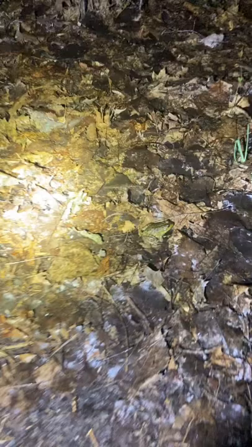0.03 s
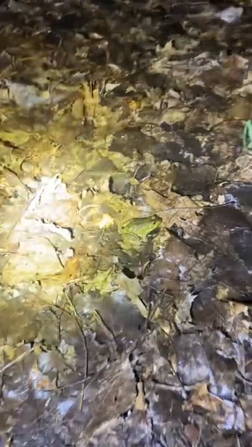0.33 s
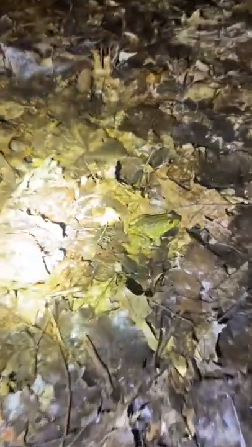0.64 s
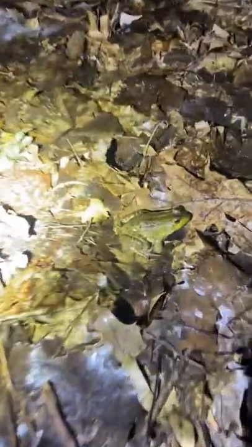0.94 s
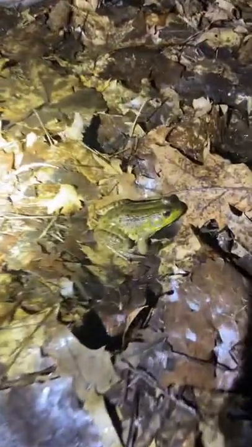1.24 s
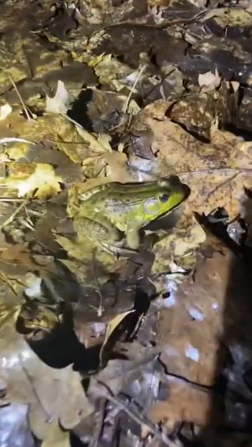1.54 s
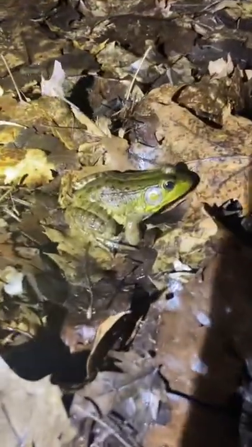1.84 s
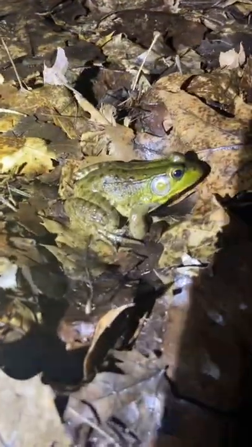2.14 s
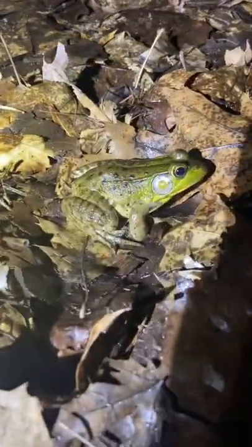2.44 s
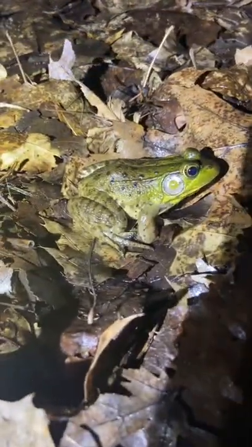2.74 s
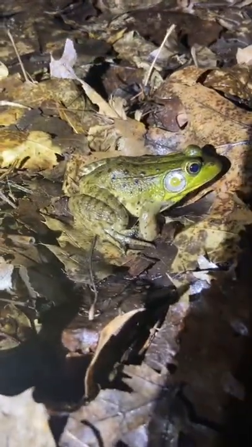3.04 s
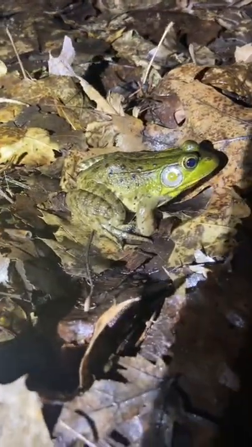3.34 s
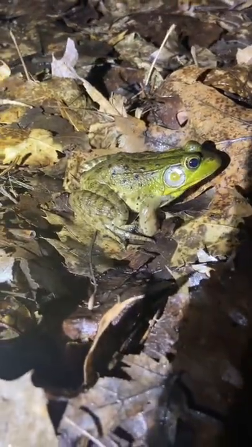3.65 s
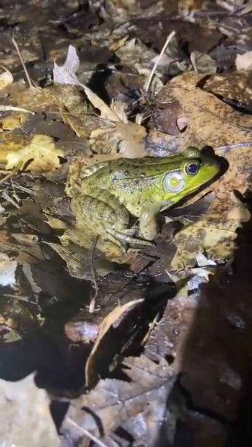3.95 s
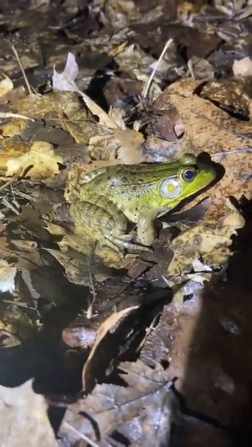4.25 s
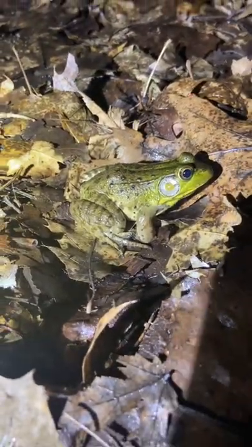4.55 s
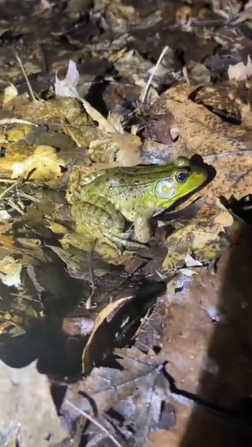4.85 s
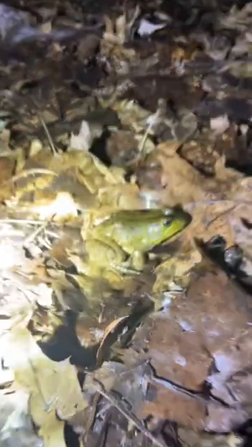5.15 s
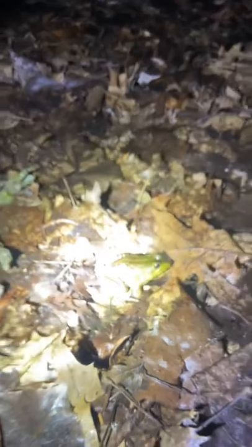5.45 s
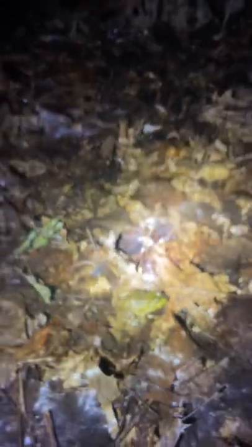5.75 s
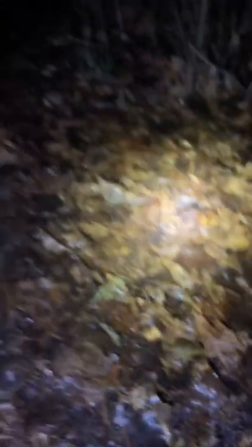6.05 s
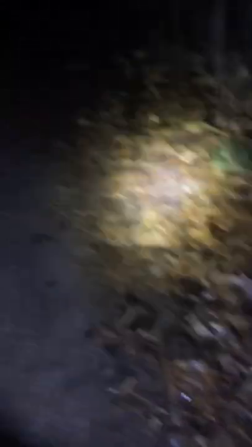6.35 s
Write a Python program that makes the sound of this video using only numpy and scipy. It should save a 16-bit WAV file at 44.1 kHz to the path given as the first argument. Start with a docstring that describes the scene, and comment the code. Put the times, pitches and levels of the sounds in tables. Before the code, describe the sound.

A wide, distant chorus of small frogs keeps up short, high, rising whistles, with a few nearer peeps standing out and faint trills below. Throughout, drops from the branches tick on the forest floor, some close and sharp. Leaves crunch briefly at the start, two louder drips land about five seconds in, and a light rustle and low handling thumps on the hand-held microphone come at the end.

```python
"""Rain drips tap on dead leaves all around, over the steady high peeping of a distant pond of frogs.
Each peep is a short rising whistle scattered by the trunks; fainter, lower voices trill beneath.
Each drip thuds, rings its leaf, snaps and sprays; a few add a brief clear tone. The litter rustles
and cracks briefly, and a low far rumble fills the night forest. Fingers bump the hand-held recorder
a few times; its two ports hear the ground a little apart in time."""
import sys
import numpy as np
from scipy import signal
from scipy.fft import rfft, irfft
from scipy.io import wavfile

SR = 44100
rng = np.random.default_rng(int(sys.argv[2]) if len(sys.argv) > 2 else 0)


def to_wav(s):
    """Save 16-bit WAV."""
    ch = np.atleast_2d(s).T  # columns
    pcm = np.round(np.clip(ch, -1, 1) * 32767)  # PCM
    wavfile.write(sys.argv[1], SR, pcm.astype(np.int16))


N = 282240
TAP_SAMPLES = SR // 30
TIME = np.arange(N) / SR
FREQS = np.maximum(np.arange(N // 2 + 1) * SR / N, 1)


def from_db(db):
    """Decibels to gain."""
    return 10 ** (np.asarray(db) / 20)


def rms_one(x):
    """Scale to unit power."""
    return x / np.sqrt(np.mean(x ** 2) + 1e-20)


def in_time(rows):
    """An automation curve: straight lines between (seconds, value) points."""
    return np.interp(TIME, *np.transpose(rows))


def at_freqs(points):
    """Straight lines between (Hz, value) points on a log-frequency axis."""
    hz, value = np.transpose(points)
    return np.interp(np.log(FREQS), np.log(hz), value)


def spread(shape=None):
    """Even chance between minus one and one."""
    return 2 * rng.random(shape) - 1


def drift(per_s):
    """A random wander through per_s points a second, drawn with spread 1."""
    knots = rng.standard_normal(2000)
    return np.interp(TIME * per_s, np.arange(len(knots)), knots)


def colour(x, spectrum):
    """Minimum-phase EQ, so nothing rings ahead of a hit; comes out at unit power."""
    cepstrum = irfft(np.log(from_db(at_freqs(spectrum))), N)
    cepstrum[1:N // 2] *= 2
    cepstrum[N // 2 + 1:] = 0
    return rms_one(irfft(rfft(x) * np.exp(rfft(cepstrum)), N))


def band(x, low_hz, high_hz):
    """Gentle band-pass."""
    sos = signal.butter(2, [low_hz, min(high_hz, .45 * SR)], "band", fs=SR, output="sos")
    return signal.sosfilt(sos, x + 1e-18)


def noise(spectrum):
    """Two unrelated noises of one colour."""
    return colour(rng.standard_normal((2, N)), spectrum)


def forest(x, t60_s=0.47):
    """Far sound arrives only as scatter from trunks, by two unrelated paths; unit power."""
    scatter = rng.standard_normal((2, SR)) * from_db(-60 * TIME[:SR] / t60_s)
    return rms_one(irfft(rfft(x) * rfft(scatter, N), N))


def ports(pair, floor_likeness=0):
    """The two ports turn a pair of signals into left and right: partly alike, the right one lagging."""
    # Stereo lag. Each row: frequency in Hz, lead of the left port in radians.
    left_lead = [(20, 0.25), (330, 0.18), (520, 1.83), (850, 2.34), (1400, 0.23), (2200, 1), (3000, 1.54),
                 (3400, 1.2), (3900, 0.9), (5000, 1.0), (6200, 1.8), (7200, 2.96), (10700, 6.2),
                 (13600, 9.3), (16000, 10.5)]
    # Stereo image. Each row: frequency in Hz, likeness of the ports from 0 to 1.
    likeness = [(20, 1), (100, 1), (170, 0.99), (280, 0.81), (480, 0.047), (850, 0.31), (1400, 0.036),
                (2100, 0.56), (3200, 0.6), (4000, 0.5), (5000, 1), (7200, 0.99), (11000, 0.92),
                (16000, 0.92)]
    alike = np.clip(at_freqs(likeness), floor_likeness, 1)
    mid = np.sqrt((1 + alike) / 2) * rfft(pair[0])
    side = np.sqrt((1 - alike) / 2) * rfft(pair[1])
    return irfft([mid + side, (mid - side) * np.exp(-1j * at_freqs(left_lead))], N)


def air(rumble_db=-53.5, hush_db=-67.0, waver_db=4.0):
    """The bed: a steady far rumble under a faint, wavering hush."""
    # EQ of the rumble and of the hush. Each row: frequency in Hz, gain in dB.
    rumble_eq = [(20, -39), (35, -15.5), (58, 1), (85, 0.5), (120, -4), (170, -3.5), (240, -10.5),
                 (330, -17), (500, -19.5), (900, -30.5), (2000, -54.5)]
    hush_eq = [(150, -10), (350, -8), (700, 4.5), (1200, 3), (2300, -8), (3800, -1.5), (6000, -27),
               (10000, -16.5), (16000, -14)]
    rumble = from_db(rumble_db) * noise(rumble_eq)
    return rumble + from_db(hush_db + waver_db * drift(14)) * noise(hush_eq)


def grains(per_s, spread_db, max_spreads, tail_s, colour_db=8.0):
    """Tiny random impacts, each with its own colour and a brief shiver of the leaf."""
    sizes = from_db(spread_db * np.minimum(rng.exponential(1, N), max_spreads))
    hits = sizes * (rng.random(N) < per_s / SR)
    decay = np.exp(-2 / (tail_s * SR))
    edges_hz = [150, 1300, 2900, 7000, 17000]
    out = 0
    for k, (low, high) in enumerate(zip(edges_hz, edges_hz[1:])):
        share = hits * from_db(colour_db * np.sqrt(3) * spread(N))
        tails = np.sqrt(signal.lfilter([1 - decay], [1, -decay], share ** 2 + 1e-18))
        clicks = share * rng.choice([-1, 1], (2, N))
        shiver = tails * rng.standard_normal((2, N))
        out = out + (-1) ** k * band(clicks + shiver, low, high)  # flipped so the bands join up
    return out


def rain(patter_db=12.5, hiss_db=5.0):
    """Countless small drops patter on the litter; the farthest merge into a hiss."""
    # Fader for patter and hiss together. Each row: time in seconds, level in dB.
    fader = [(0.05, -73), (0.56, -68.5), (0.77, -74.5), (2.86, -76.5), (5.08, -76), (5.91, -70),
             (6.35, -73)]
    # EQ of the wet litter. Each row: frequency in Hz, gain in dB.
    patter_eq = [(200, -20), (600, 0.5), (1300, -1), (2200, 3), (3800, -1.5), (5500, -1), (8000, -7.5),
                 (12000, -9.5), (16000, -26)]
    drops = colour(grains(per_s=130, spread_db=4.0, max_spreads=0.84, tail_s=0.026), patter_eq)
    return from_db(in_time(fader)) * (from_db(patter_db) * drops + from_db(hiss_db) * noise(patter_eq))


def rustle():
    """Leaves shift against each other in swells of soft crackle; the drier ones add a crisp swish."""
    # Shifts of the litter. Each row: crest in seconds, level in dB, rise and fall in seconds per 20 dB,
    # swish in dB relative to that level.
    shifts = [(0.13, -54.5, 0.28, 0.2, -6), (0.52, -59.5, 0.85, 0.22, -8), (0.62, -56, 0.1, 1, -20),
              (0.84, -58.5, 0.57, 0.45, -8), (1.2, -63, 0.33, 0.74, -0.5), (6.0, -61.5, 1, 0.87, -5)]
    # EQ of the soft crackle. Each row: frequency in Hz, gain in dB.
    rustle_eq = [(100, -25), (400, -4.5), (900, -8), (1800, 8), (2500, 1), (3300, -17), (4500, -13.5),
                 (7000, -9), (15000, -12)]
    clumped_per_s = 500 * from_db(3.4 * drift(40))
    crackle = grains(clumped_per_s, spread_db=2.0, max_spreads=1.7, tail_s=0.0078, colour_db=1.0)
    swish = rms_one(band(crackle, 3700, 5600))
    crest_s, level_db, rise_s, fall_s, swish_db = np.transpose(shifts)[:, :, None]
    from_crest = np.maximum((crest_s - TIME) / rise_s, (TIME - crest_s) / fall_s)
    swells = from_db(level_db - 20 * from_crest.clip(0, 10))
    soft = swells.max(axis=0) * colour(crackle, rustle_eq)
    return soft + (swells * from_db(swish_db)).max(axis=0) * swish


def tap(tail_s, shiver, ring=0.0, ring_hz=1930, ring_s=0.0013, rebound=0.1, aside=2.4):
    """One impact: a spike, a rebound, a noisy shiver and, with ring, a few cycles of the leaf's tone."""
    t = TIME[:TAP_SAMPLES]
    fade = np.exp(-t / tail_s)
    hit = shiver * rng.standard_normal((2, len(t))) * fade / np.linalg.norm(fade)
    hit[:, 0] += [1, aside * rng.choice([-1, 1])]  # the second signal sets the hit off to one side
    hit[0, int(rng.uniform(.0012, .0026) * SR)] += rebound * spread()
    tone = np.exp(-t / ring_s) * np.cos(2 * np.pi * ring_hz * t)
    hit[0] += ring * tone / (ring_s * SR / 2)
    return hit / np.linalg.norm(hit[0]) / (1 + ring / 2)


def tap_span(start_s):
    """The samples that one impact fills."""
    start = int(start_s * SR)
    return slice(start, start + TAP_SAMPLES)


def knocks(rows, log_width, tail_s, shiver):
    """Brief impacts, each confined to a band round its own pitch."""
    out = np.zeros((2, N + SR))
    for start_s, level_db, hz in rows:
        knock = band(tap(tail_s, shiver), hz * np.exp(-log_width), hz * np.exp(log_width))
        out[:, tap_span(start_s)] += from_db(level_db) * knock
    return out[:, :N]


def cracks():
    """Dry leaves give way as the litter is pressed, each with a short pitched crunch."""
    # Each row: start in seconds, level ahead of the band-pass in dB, pitch in Hz.
    crunches = [(.479, -19, 4400), (.494, -17, 4400), (.508, -19, 4300), (.541, -16, 4160),
                (.555, -10, 4200), (.583, -10, 1680), (.593, -13, 1650), (.623, -22, 1470),
                (.626, -23, 2380), (.649, -11, 1500), (.670, -8, 2640), (.690, -26, 1600),
                (.722, -17, 2120), (.733, -14, 2110), (.753, -11, 2200), (.760, -11, 2260),
                (.728, -18, 4250), (.785, -24, 4180), (.803, -9, 2000), (.832, -20, 2150),
                (.866, -17, 4040), (.878, -16, 2050), (3.025, -24, 2980)]
    return knocks(crunches, log_width=0.11, tail_s=0.0062, shiver=2.2)


def pats():
    """Short dull knocks, from drops and from a finger bumping the casing."""
    # Each row: start in seconds, level ahead of the band-pass in dB, pitch in Hz.
    dull_knocks = [(.585, -13, 546), (.612, -16, 490), (.622, -14.5, 700), (1.624, -16, 656),
                   (1.874, -16, 480), (2.159, -16, 546), (4.057, -19.5, 890), (5.938, -17, 590)]
    return knocks(dull_knocks, log_width=0.87, tail_s=0.0036, shiver=1.0)


def bumps(rise_cycles=0.19, settle_s=0.0083, overtone_ratio=2.01, overtone_db=-13, finger_cut_hz=450):
    """Soft fingers nudge the casing: a low, damped wobble that sinks in pitch, with a weak overtone."""
    # Each row: start in seconds, level in dB, first and settled pitch in Hz, seconds to fall 60 dB.
    nudges = [(1.272, -34, 133, 123, 0.063), (1.369, -33, 74.5, 66, 0.073), (1.8734, -27.5, 307, 71, 0.087),
              (6.282, -27.5, 70, 65.6, 0.62), (6.308, -26, 193, 137, 0.053), (6.334, -20, 84.5, 81, 0.057),
              (6.351, -26, 52, 44.4, 0.084), (6.366, -18, 98, 78, 0.21), (6.383, -32, 300, 198, 0.03)]
    out = np.zeros(N)
    for start_s, level_db, first_hz, hz, t60 in nudges:
        t = np.maximum(TIME - start_s, 0)
        phase = 2 * np.pi * (hz * t + (first_hz - hz) * settle_s * (1 - np.exp(-t / settle_s)))
        wobble = np.sin(phase) + from_db(overtone_db) * np.sin(overtone_ratio * phase)
        attack = (1 - np.exp(-t * hz / rise_cycles)) ** 2  # lower bumps build more slowly
        out += from_db(level_db - np.minimum(60 * t / t60, 200)) * attack * wobble
    return signal.sosfilt(signal.butter(2, finger_cut_hz, fs=SR, output="sos"), out)


def trillers(crowd_db=-66.0, pulse_hz=30, wander_hz=26):
    """Lower frog voices: a far blur, and a few held, pulsing trills scattered by the trunks."""
    # EQ of the blur. Each row: frequency in Hz, gain in dB.
    crowd_eq = [(1000, -35.5), (1450, -3), (1650, 1), (1780, 5), (1950, 6), (2150, -10), (2600, -16),
                (3200, -43.5)]
    # Held trills. Each row: pitch in Hz, level in dB.
    trills = [(1716, -72.5), (1785, -77.5), (1860, -84.5)]
    crowd = noise(crowd_eq) * from_db(crowd_db + 0.5 * drift(25.44))
    voices = 0
    for hz, level_db in trills:
        pulses = 1 + 0.68 * np.sin(2 * np.pi * (pulse_hz * TIME + rng.random()))
        tone = np.sqrt(2) * np.sin(2 * np.pi * np.cumsum(hz + wander_hz * drift(8)) / SR)
        voices = voices + from_db(level_db) * pulses * tone
    return crowd + np.std(voices) * forest(voices)


def peep(hz, length_s, glide, swell=0.81):
    """One frog call: a short, nearly pure whistle that swells and fades as its pitch rises."""
    progress = np.linspace(0, 1, int(length_s * SR))
    cycles = hz * np.cumsum(1 + glide * (np.sqrt(progress) - 2 / 3)) / SR  # hz is the mean pitch
    return np.sin(np.pi * progress).clip(0) ** swell * np.sin(2 * np.pi * cycles)


def far_peepers(groups=5, per_group=40, middle_hz=3180, spread_hz=185, period_s=0.8, trim_db=3.0):
    """Groups of far frogs round the pond; each frog repeats its peep at its own pitch and pace."""
    # Fader for the chorus. Each row: time in seconds, level in dB ahead of the trim.
    fader = [(0.05, -55.5), (0.6, -54.5), (1.5, -56.3), (2.9, -57.6), (3.7, -58), (4.2, -57.5),
             (5.1, -56.5), (5.55, -56), (6.35, -56.5)]
    rank = np.linspace(.015, .985, groups * per_group)
    pitches = middle_hz + spread_hz * np.arctanh(2 * rank - 1)  # most frogs are of middling size
    chorus = 0
    for group in range(groups):
        voices = np.zeros(N + SR)
        for hz, turn in zip(pitches[group::groups], rng.permutation(per_group)):  # neighbours take turns
            own_period_s = period_s * rng.uniform(.9, 1.1)
            voice_db = -2.0 * ((hz - middle_hz) / spread_hz) ** 2  # highest and lowest are fainter
            for k, (late, sharp, loud) in enumerate(rng.standard_normal((14, 3))):
                start = int((turn / per_group + k - 1 + 0.03 * late) * own_period_s * SR)
                if 0 <= start < N:
                    call = peep(hz * (1 + 0.00893 * sharp), length_s=0.1009, glide=0.0494)
                    voices[start:start + len(call)] += from_db(voice_db + 0.4 * loud) * call
        voices[:SR] += voices[N:]  # tails wrap round, so the chorus is already under way
        chorus = chorus + forest(voices[:N])
    return from_db(in_time(fader) + trim_db) * rms_one(chorus)


def near_peepers(direct_db=2.0, echo_db=-7.0, vary=0.25):
    """Nearer frogs stand out of the chorus, heard directly and with a short echo from the trees."""
    # Each row: crest in seconds, pitch in Hz, level in dB ahead of the direct and echo gains.
    near_calls = [(.07, 3101, -56), (0.108, 3198, -51), (0.221, 3210, -52), (.29, 3214, -53),
                  (0.371, 3090, -53), (.43, 3273, -50), (.5, 3250, -49), (0.561, 3090, -59),
                  (0.611, 3150, -52), (0.662, 3210, -53), (0.759, 3140, -52), (.8, 3220, -59),
                  (1.031, 3198, -48), (1.05, 3316, -51), (1.071, 3112, -53), (1.15, 3370, -52),
                  (1.2, 3180, -48), (1.29, 3150, -56), (1.37, 3326, -50), (1.53, 3150, -53),
                  (1.63, 3143, -50.5), (1.741, 3310, -49), (1.87, 3080, -56), (2.14, 3250, -56),
                  (2.23, 3020, -67), (2.3, 3060, -51), (2.39, 3198, -47.5), (2.569, 3170, -58),
                  (3.042, 3245, -54), (3.14, 3180, -54), (3.27, 3130, -53), (3.501, 3160, -52),
                  (3.619, 3112, -50), (3.77, 3310, -51.5), (3.922, 3190, -55), (4.04, 3112, -51),
                  (4.099, 3122, -53), (4.199, 3219, -50), (4.301, 3160, -55), (4.39, 3230, -56),
                  (4.49, 3176, -52), (4.681, 3130, -49), (4.702, 3057, -49), (5.17, 3260, -53),
                  (5.29, 3280, -51), (5.54, 3219, -49), (5.59, 3130, -55), (5.64, 3262, -52),
                  (5.88, 3170, -58), (6.3, 3230, -47.5), (6.379, 3165, -49)]
    calls = np.zeros(N + SR)
    for crest_s, hz, level_db in near_calls:
        length_s = 0.065 * np.exp(vary * spread())
        glide = 0.0414 * (1 + 2 * vary * spread())
        call = peep(hz, length_s, glide, swell=2.8)
        start = max(int(crest_s * SR) - len(call) // 2, 0)
        calls[start:start + len(call)] += from_db(level_db) * call
    out = from_db(echo_db) * np.std(calls[:N]) * forest(calls[:N])
    out[0] += from_db(direct_db) * calls[:N]
    return out


def drip_tones(contact_s=0.00075):
    """The brief pitched ring of some of the loud leaf drips: a clear knock or a high tick."""
    # Each row: start in seconds, relative level in dB, pitch in Hz, seconds to fall 60 dB.
    rings = [(1.197, -37, 6460, 0.0055), (1.681, -34.5, 6140, 0.0048), (2.2318, -26, 2010, 0.0063),
             (3.479, -39.5, 5450, 0.0055), (4.1094, -39, 3280, .005), (4.9403, -25, 2870, 0.0047),
             (5.101, -33, 5060, 0.0047), (5.7352, -41, 5300, 0.0087)]
    out = np.zeros((2, N + SR))
    t = TIME[:TAP_SAMPLES]
    for start_s, level_db, hz, t60 in rings:
        envelope = from_db(level_db - 60 * t / t60) * (1 - np.exp(-t / contact_s))
        out[0, tap_span(start_s)] += 2 * envelope * np.sin(2 * np.pi * hz * t)
    return out[:, :N]


def small_drips(per_s=14):
    """Rows for drips(): one lesser drip somewhere in each slot of time, with a colour of its own."""
    chance = spread((400, 6))
    starts_s = (np.arange(len(chance)) + (1 + chance[:, 0]) / 2) / per_s
    levels_db = (-25.5, -28, -29) + chance[:, 1:4] * (8, 5, -2)  # ring, snap, spray
    pitches_hz = (1960, 5300) * np.exp(0.52 * chance[:, 4:])  # ring, snap
    rows = np.column_stack([starts_s, levels_db, pitches_hz])
    return rows[starts_s < N / SR]


def drips(thud_trim_db=-6.5, leaf_trim_db=2.0, spray_trim_db=-5.5, far_blur=3.3):
    """Drops from the branches hit dead leaves: thud, ring, snap and spray; the far ones are blurred."""
    # The loudest drips, on near leaves. Each row: start in seconds, relative levels of ring, snap
    # and spray in dB, pitches of ring and snap in Hz.
    near_drips = [(0.132, -13, -11.5, -24, 1280, 4640), (0.2166, -10.5, -27, -23, 2100, 4400),
                  (0.2635, -13.5, -36, -25, 1800, 5000), (0.3671, -21, -15, -19.5, 2450, 6200),
                  (0.4207, -15, -14, -24, 2720, 4800), (0.454, -12, -14, -21.5, 1940, 5400),
                  (0.462, -26, -10, -31, 2500, 6040), (0.5538, -18, -18, -42, 2100, 4360),
                  (0.577, -11, -38, -49, 1900, 4300), (0.593, -10.5, -38, -49, 1900, 4500),
                  (0.6207, -11, -23, -29, 1700, 5500), (0.7025, -15, -21, -16, 2400, 6100),
                  (0.8505, -16, -17, -44, 1800, 4800), (0.8604, -20, -30, -40, 2340, 3800),
                  (1.0, -16.5, -25, -23, 1790, 4700), (1.0425, -20, -17, -23, 1810, 5100),
                  (1.163, -14.5, -21, -26, 1840, 5400), (1.187, -15, -20, -17.5, 1950, 5800),
                  (1.1964, -15.5, -8.5, -20, 1620, 6100), (1.2663, -15, -21, -15, 2320, 4900),
                  (1.2777, -13, -34, -28, 1200, 3900), (1.3225, -19, -16.5, -23, 1850, 4900),
                  (1.3595, -21, -41, -14.5, 1700, 5400), (1.3945, -20, -21, -19.5, 2200, 6300),
                  (1.43, -32, -12.5, -20, 2640, 6600), (1.548, -17.5, -11.5, -8, 2000, 5600),
                  (1.6073, -13, -16, -41, 1920, 4000), (1.681, -15, -21, -14, 1700, 6060),
                  (1.7665, -35, -36, -23, 2100, 5600), (1.9905, -22, -20, -42, 2000, 5300),
                  (1.93, -11.5, -17, -20, 2580, 5600), (2.051, -16.5, -29, -24, 1880, 4500),
                  (2.1365, -14.5, -28, -25, 2500, 4700), (2.2316, -11, -9.5, -17, 2420, 3870),
                  (2.2945, -17, -18, -29, 2350, 5000), (2.3017, -13, -17, -24, 2250, 5100),
                  (2.3166, -19, -16.5, -27, 1650, 6000), (2.367, -24, -18, -44, 2190, 5200),
                  (2.4268, -20.5, -15.5, -43, 1420, 4970), (2.7745, -37, -17.5, -30, 1700, 5600),
                  (2.868, -19, -33, -23.5, 1850, 5300), (2.978, -35, -23, -30, 2500, 6040),
                  (3.0865, -18, -20, -25, 1690, 5000), (3.2, -17.5, -27, -45, 1950, 4300),
                  (3.2329, -20, -21, -23, 1900, 5500), (3.263, -19.5, -24, -27, 1950, 5600),
                  (3.363, -15, -14, -17.5, 2070, 5570), (3.4161, -21, -20, -16.5, 1390, 4600),
                  (3.479, -15, -13.5, -34, 1750, 4900), (3.632, -18, -18, -22.5, 1900, 4930),
                  (3.8338, -28, -20, -33, 2100, 5400), (3.947, -33, -28, -30, 2000, 5200),
                  (3.96, -14, -24, -23, 2170, 4600), (3.9765, -25, -14.5, -32, 2650, 5130),
                  (4.1103, -15.5, -14.5, -35, 2540, 4360), (4.334, -13, -38, -30, 2250, 5600),
                  (4.0004, -28, -25, -22, 2000, 5000), (4.3875, -23, -22, -25.5, 2200, 5170),
                  (4.658, -27, -35, -27, 1900, 5000), (4.6698, -13, -25, -23, 1950, 4320),
                  (4.896, -6, -8, -19.5, 2040, 4180), (4.9398, -4.5, 3, -17, 1850, 5630),
                  (4.9422, -20, -20, -13, 2080, 6000), (4.978, -24, -23, -23, 2040, 6230),
                  (4.987, -17, -24, -25, 2410, 4000), (5.1013, -15.5, -17, -33, 2270, 4300),
                  (5.2357, -17, -35, -16.5, 2550, 5800), (5.4876, -10.5, -13.5, -31, 1940, 6400),
                  (5.5637, -15, -20, -22, 2300, 4500), (5.7352, -12.5, -21, -31, 2250, 5240),
                  (5.5185, -20, -16.5, -26, 2100, 5200), (5.5813, -21, -19, -37, 2000, 4800),
                  (5.8936, -29, -17.5, -26, 2100, 5300), (5.777, -29, -37, -19.5, 2000, 4600),
                  (5.985, -21, -17, -28, 2180, 4800)]
    thud, leaf, snap, spray = np.zeros((4, 2, N + SR))
    for rows, blur in ((near_drips, 1), (small_drips(), far_blur)):
        for start_s, ring_db, snap_db, spray_db, ring_hz, snap_hz in rows:
            at = tap_span(start_s)
            thud[:, at] += from_db(ring_db + thud_trim_db) * tap(tail_s=0.004, shiver=1.0)
            leaf[:, at] += from_db(ring_db + leaf_trim_db) * tap(
                tail_s=0.0092, shiver=0.51 * blur, ring=3.4, ring_hz=ring_hz, ring_s=0.0018)
            snap[:, at] += from_db(snap_db) * tap(
                tail_s=0.0016 * blur, shiver=1.86 * blur, ring=2.1, ring_hz=snap_hz, ring_s=0.00064)
            spray[:, at] += from_db(spray_db + spray_trim_db) * tap(
                tail_s=0.00065 * blur, shiver=1.1 * blur)
    body = band(thud, 590, 1340) - band(leaf, 1450, 3620)
    top = band(snap, 2400, 6830) - band(spray, 6800, 13900)
    return (body + top)[:, :N]


def scene():
    """Frogs, air and litter spread wide, the drips sit narrower; bumps come through the casing."""
    frogs = far_peepers() + near_peepers() + trillers()
    ambience = ports(frogs + air() + rain() + rustle() + cracks() + pats())
    dripping = ports(drips() + drip_tones(), floor_likeness=0.57)
    return ambience + dripping + bumps()


def record(dry, opens_s=0.036, cutoff_hz=16200):
    """The input opens after a moment of near silence; the top is cut steeply."""
    gate = np.where(TIME < opens_s, from_db(-56), 1)
    return signal.sosfilt(signal.ellip(10, .1, 80, cutoff_hz, fs=SR, output="sos"), dry * gate)


dry = scene()
out = record(dry)
to_wav(out)
```